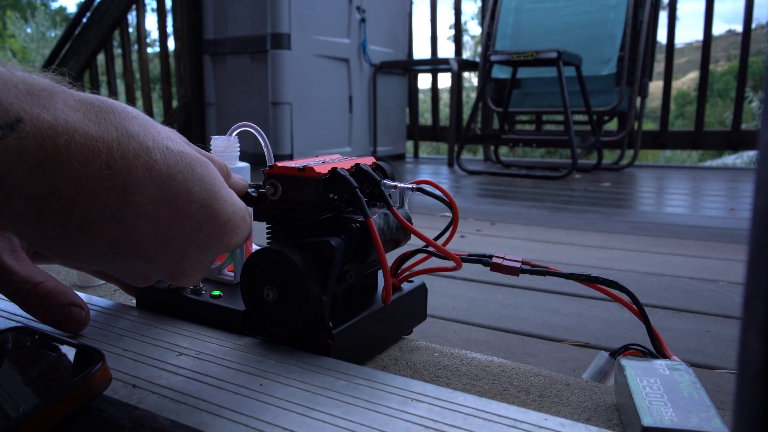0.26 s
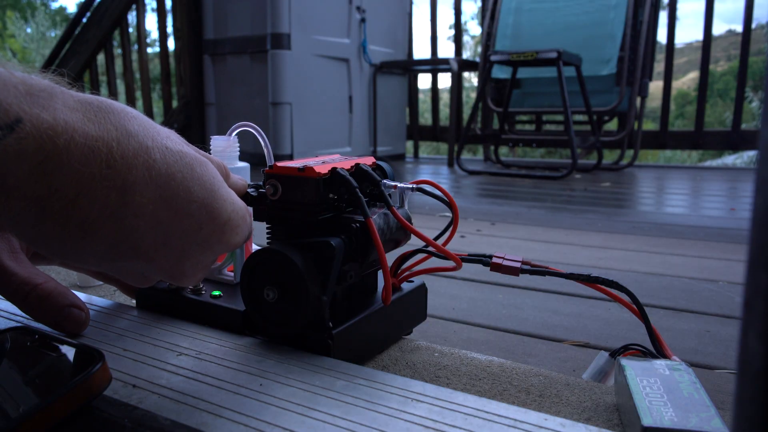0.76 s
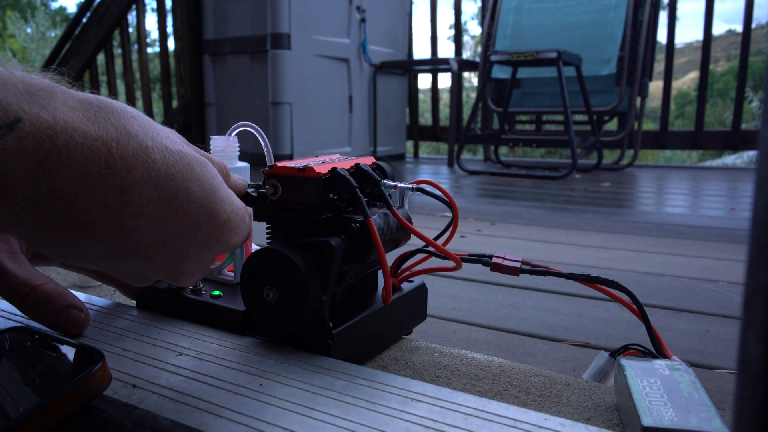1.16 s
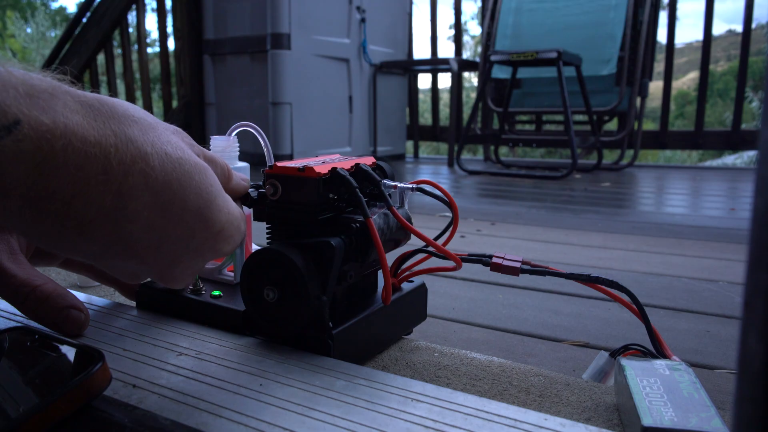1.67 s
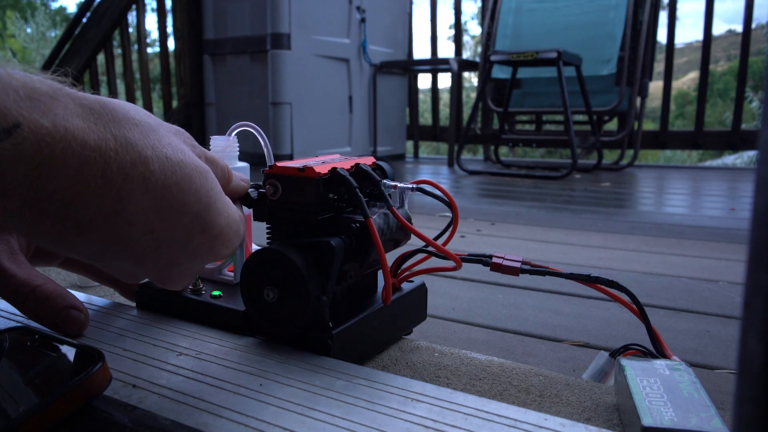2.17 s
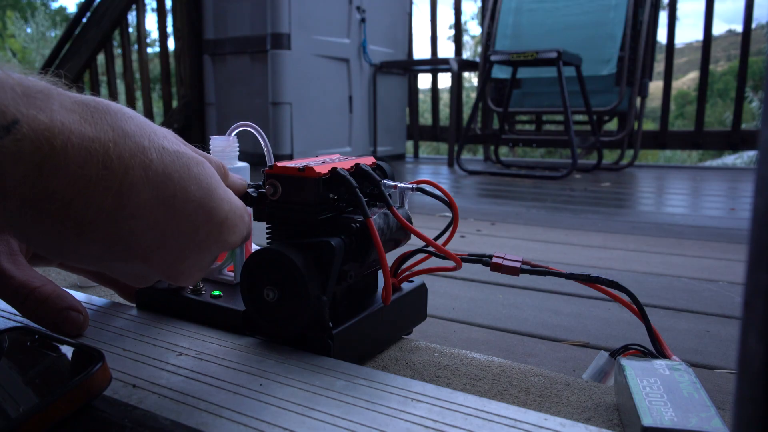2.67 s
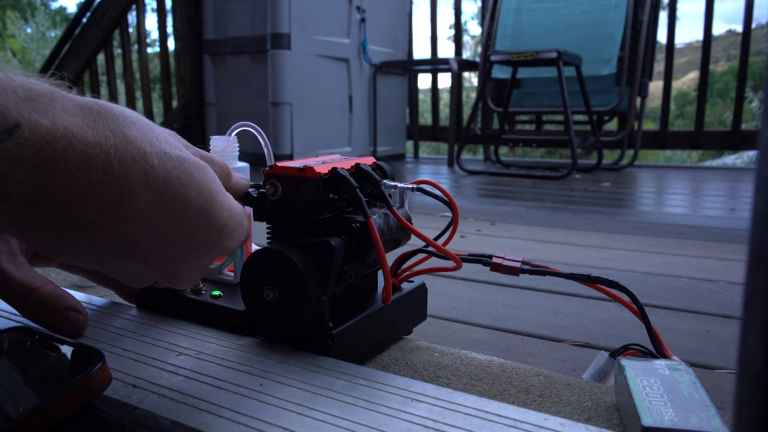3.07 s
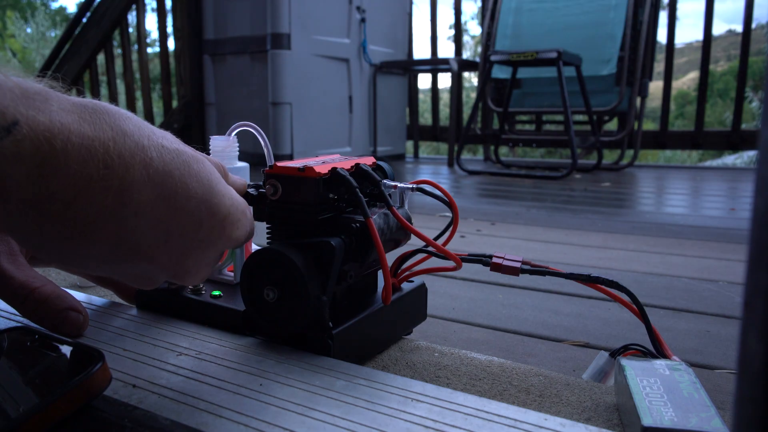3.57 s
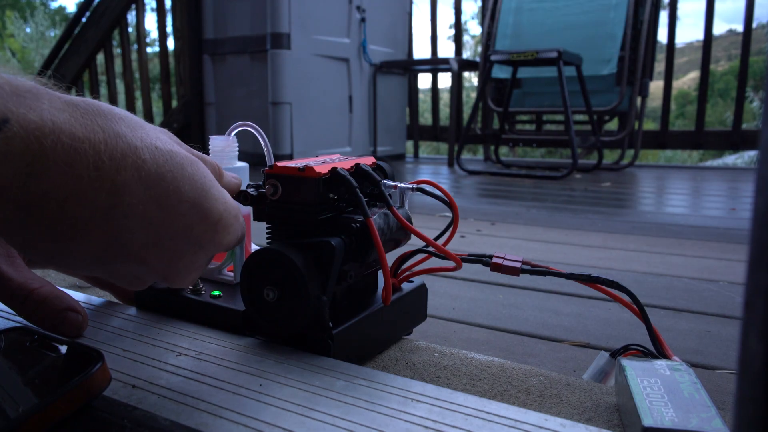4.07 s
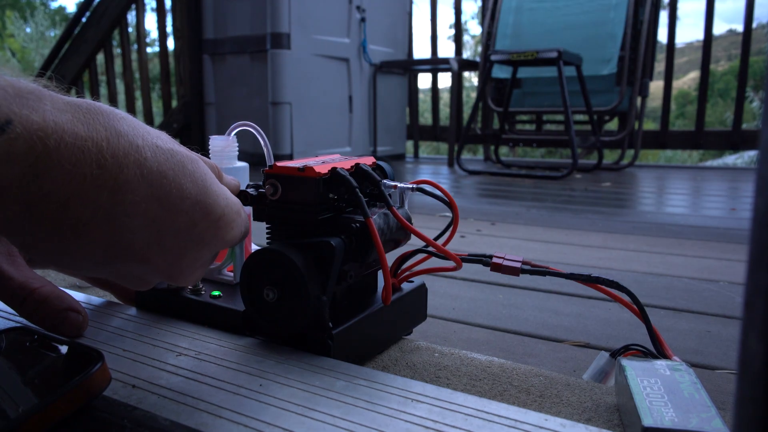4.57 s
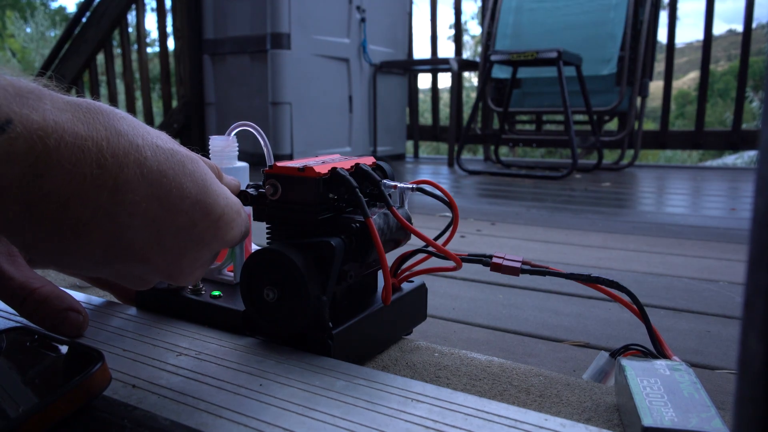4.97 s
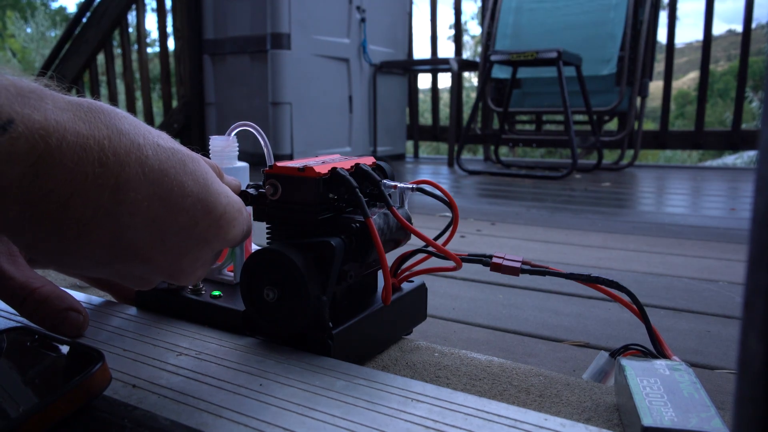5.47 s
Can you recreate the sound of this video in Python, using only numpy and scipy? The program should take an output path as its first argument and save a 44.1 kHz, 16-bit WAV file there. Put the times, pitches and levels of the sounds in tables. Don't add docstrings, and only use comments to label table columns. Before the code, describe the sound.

From the first instant an electric starter is already turning a tiny twin-cylinder engine, very close, on a wooden deck. The bed is a fast, even chug at roughly twenty-two cycles a second, two short air gulps per cycle, laced with valve clicks, metallic rattling, a high wavering gear whine that swells with each turn, and steady brush and fan hiss. A hard pop opens the sound; others follow at 0.1, a close pair at 0.4, another at 0.6, then scattered single pops to about 1.0. After a gap, several come between 1.4 and 1.7. From 1.9 to 2.6 there is only cranking, then pops near 2.7 and 3.0 with faint spits around them. A strong pair hits at 3.7, and from 3.9 pops crowd into an irregular, sputtering string, slightly weaker towards the end at 5.7. Each is a brief thump with a bright crack and short deck echo. It never runs steadily.

```python
import sys
import numpy as np
from scipy import signal
from scipy.fft import rfft, irfft, next_fast_len
from scipy.io import wavfile
from scipy.ndimage import uniform_filter1d

SR = 44100
rng = np.random.default_rng(int(sys.argv[2]) if len(sys.argv) > 2 else 0)


def nominal_scale(level):
    x = np.asarray(level, float) / 20
    return 10 ** x


def unload_wav(signal):
    wavfile.write(
        sys.argv[1],
        SR,
        np.round(np.clip(np.atleast_2d(signal).T, -1, 1) * 32767).astype(np.int16),
    )


N = 252163


def evened(x):
    return x / np.sqrt(np.mean(x ** 2) + 1e-20)


def read(points, hz):
    f, value = np.transpose(points)
    return np.interp(np.log(hz + 1), np.log(f + 1), value)


def add(mix, start_s, sound):
    part = mix[..., round(start_s * SR):][..., :sound.shape[-1]]
    part += sound[..., :part.shape[-1]]


def resonate(x, hz, width_hz):
    b, a = signal.iirpeak(hz, hz / (1.09 * width_hz), SR)
    return signal.lfilter(b, a, signal.lfilter(b, a, x))


# time_s, turn_cycles
CRANK = [(-0.0064, -1), (0.2602, 5), (0.3926, 8), (0.8775, 19), (1.0547, 23), (1.2329, 27), (1.4542, 32),
         (1.6781, 37), (2.3472, 52), (2.7474, 61), (3.2821, 73), (4.0881, 91), (4.2667, 95), (4.6262, 103),
         (4.8496, 108), (5.7488, 128)]


def cycles():
    return np.interp(np.arange(N) / SR, *np.transpose(CRANK))


# frequency_hz, coherence_ratio
COHERENCE = [(60, 1.0), (300, 1.0), (600, .96), (1500, .75), (3100, .4), (6800, .2), (15000, .05)]
# frequency_hz, density_db (per Hz)
HISS = [(40, -14), (70, -13), (300, -11), (600, -12), (850, -4), (1100, -7), (1680, 2), (2150, -8),
        (3100, -2), (4100, -5), (6500, 0), (9000, -6), (13400, -4), (15500, -6)]


def hiss():
    frames, hz = N // 128 + 5, np.fft.rfftfreq(512, 1 / SR)
    a, b, c, d, patches = rng.standard_normal((frames, 257, 5)).T
    patches = uniform_filter1d(patches, size=10, axis=0)
    patches = evened(uniform_filter1d(patches, size=6, axis=1))
    same = np.clip(read(COHERENCE, hz), -1, 1)[:, None]
    left = a + 1j * b
    right = same * left + np.sqrt(1 - same ** 2) * (c + 1j * d)
    z = np.array([left, right]) * nominal_scale(read(HISS, hz)[:, None] + 1.6 * patches)
    noise = signal.istft(z, nperseg=512, noverlap=384)[1][:, :N]
    breath_db = 1.47 * np.cos(2 * np.pi * (cycles() - .02))
    return nominal_scale(-44 + breath_db) * evened(noise)


# frequency_hz, t60_s
DECK_DECAY = [(200, 0.22), (1000, 0.039), (4000, 0.035), (12000, 0.066)]
# delay_s, level_db
ECHOES = [(.0077, -17), (.0124, -19), (.0158, -20), (.0195, -24)]


def deck(x):
    size, scatter_db = SR // 4, -15
    taps = np.zeros((2, size))
    at = np.arange(60, size - 20, 20) + rng.integers(0, 20, (2, (size - 61) // 20))
    np.put_along_axis(taps, at, rng.choice([-1., 1.], at.shape), 1)
    hz, t, z = signal.stft(taps, SR, nperseg=128)
    same = np.clip(read(COHERENCE, hz), 0, 1)[:, None]
    z = np.array([z[0], same * z[0] + np.sqrt(1 - same ** 2) * z[1]])
    z = z * np.exp(-np.log(1000) * t / read(DECK_DECAY, hz)[:, None])
    tail = signal.istft(z, SR, nperseg=128)[1]
    tail = nominal_scale(scatter_db) * tail / np.linalg.norm(tail[0])
    for delay_s, level_db in ECHOES:
        add(tail, delay_s, nominal_scale(level_db) * np.hanning(9) / 4)
    return signal.fftconvolve(x, tail, axes=1)[:, :N]


GEAR_LOAD = [
    (.29, 0.13, 0.22),
    (.64, 0.1, -0.24),
    (.92, 0.13, -0.2),
]
# frequency_hz, width_hz, level_db
GEAR_CASE = [(3370, 290, -57.5), (3088, 160, -62)]


def gears():
    turn, teeth_per_cycle, mesh_db = cycles(), 157, -51.5
    load = np.zeros(N)
    for place, length, force in GEAR_LOAD:
        distance = (turn - place + .5) % 1 - .5
        load += force * np.exp(-(distance / length) ** 2)
    wander = uniform_filter1d(rng.standard_normal(N), size=4000)
    wander = evened(uniform_filter1d(wander, size=4000))
    mesh = nominal_scale(mesh_db) * evened(load * np.sin(2 * np.pi * teeth_per_cycle * turn + .8 * wander))
    case = np.zeros(N)
    for hz, width_hz, level_db in GEAR_CASE:
        case += nominal_scale(level_db) * evened(resonate(rng.standard_normal(N), hz, width_hz))
    return mesh + (0.99 + abs(load)) * case


# place_cycles, frequency_hz, width_hz, shake_cycles, level_db, spread_db
RATTLES = [(0.866, 1550, 260, 0.19, -58.5, -2), (0.0044, 1620, 360, 0.12, -57, 2),
           (0.716, 829, 120, 0.15, -60.5, .5), (.22, 2600, 700, .03, -62, 1.5),
           (.46, 2700, 900, .02, -64, 1.5), (.77, 3050, 600, .1, -62, 1.5),
           (0.98, 1900, 11000, 0.086, -55.5, -2), (0.24, 4700, 1700, 0.013, -63, -0.5),
           (.76, 5700, 13000, 0.038, -56.5, 3.5), (1, 12000, 5400, 0.019, -69.5, 0),
           (0.45, 7500, 3400, 0.028, -57, 3.5), (1, 13000, 8300, 0.047, -72, 11.5)]


def rattles():
    out, turn = np.zeros(N), cycles() + 2
    blows = rng.standard_normal((5, 140)).clip(-1.7, 2)
    for place, hz, width_hz, length, level_db, spread_db in RATTLES:
        lap = turn - place
        force = nominal_scale(min(spread_db, 3) * blows[round(4 * place)])[lap.astype(int)]
        age = (lap % 1) / length
        shake = force * age * np.exp(-2 * age) * rng.standard_normal(N)
        out += nominal_scale(level_db) * evened(resonate(shake, hz, width_hz))
    return out


# place_cycles, pitch_hz, ring_s, level_db, spread_db
KNOCKS = [(.762, 1708, 0.0015, -34.5, 1), (0.812, 1470, 0.0024, -46, 0), (0.019, 834, 0.0029, -45.5, 1.5),
          (.47, 1240, 0.00027, -42.5, -2)]


def knocks():
    out, t = np.zeros(N), np.arange(700) / SR
    time_s, turn = np.transpose(CRANK)
    for place, pitch_hz, ring_s, level_db, spread_db in KNOCKS:
        envelope = (t / ring_s * np.exp(1 - t / ring_s)) ** 1.28
        for k, (late, sharp, hard) in enumerate(rng.standard_normal((129, 3))):
            start_s = np.interp(k - 1 + place, turn, time_s, -1, N) + 0.00021 * late
            tone = np.sin(2 * np.pi * pitch_hz * (1 + 0.021 * sharp) * t) * envelope
            if start_s >= 0:
                add(out, start_s, nominal_scale(level_db + spread_db * hard) * tone)
    return out


def slug(length_s):
    u = np.arange(0, length_s, 1 / SR) / length_s
    swing = (np.sin(3 * np.pi * u ** 1.15) - .14) / 1.14
    return swing * np.sin(np.pi * u ** 1.8) ** .6


# place_cycles, length_s, level_db, direction_sign
GULPS = [
    (.952, .0037, -36.5, -1),
    (.21, .0037, -35.3, -1),
    (.035, .003, -47, 1),
    (.289, .003, -47, 1),
    (.47, .0015, -40, 1),
    (.85, .013, -60, -1),
    (.105, .013, -60, -1),
]


def gulps():
    out = np.zeros(N)
    time_s, turn = np.transpose(CRANK)
    fired = np.interp(np.transpose(FRONT_POPS + REAR_POPS)[0], time_s, turn)
    for place, length_s, level_db, direction in GULPS:
        for k, hard in enumerate(rng.standard_normal(129)):
            moment = k - 1 + place
            start_s = np.interp(moment, turn, time_s, -1, N)
            unburnt = abs(fired + .02 - moment).min() > .07
            if start_s >= 0 and unburnt:
                add(out, start_s, direction * nominal_scale(level_db + 0.64 * hard) * slug(length_s))
    return out


# start_s, thump_db, jet_db
FRONT_POPS = [(0.1244, -23.5, -30.5), (0.3904, -22.5, -27.5), (0.6107, -22.5, -25), (0.7437, -28, -30.5),
              (1.4972, -23, -27.5), (1.7213, -24, -26), (2.657, -22, -26), (2.9682, -23, -24.5),
              (3.7276, -26, -31), (3.8176, -23.5, -32), (3.9519, -24, -26.5), (4.0412, -29, -33),
              (4.131, -23.5, -25.5), (4.2197, -27, -28), (4.5342, -25, -29), (4.669, -25, -31),
              (4.7578, -46, -39), (4.9375, -26, -30), (5.2068, -25.5, -34), (5.3425, -26.5, -34.5),
              (5.6128, -30.5, -34.5), (5.703, -29, -37)]
# start_s, thump_db, jet_db
SPITS = [(1.8548, -46, -42), (2.79, -50, -56), (2.9238, -56, -35.5), (3.0135, -50, -45), (3.058, -43, -47),
         (3.1035, -44, -38)]
# start_s, thump_db, jet_db
REAR_POPS = [(0.004, -21, -24.5), (0.402, -20.5, -25), (0.6226, -20, -23), (0.8872, -21.5, -27.5),
             (0.9749, -26, -34.5), (1.375, -21, -24), (1.5528, -25.5, -33), (3.7395, -20.5, -21.5),
             (4.008, -30.5, -32.5), (4.0977, -22.5, -29), (4.2316, -21, -27.5), (4.3213, -26, -33),
             (4.3669, -26, -34), (4.4097, -30.5, -37), (4.4562, -25, -35.5), (4.5459, -24, -32.5),
             (4.6357, -26, -36), (4.7252, -29.5, -37), (4.7699, -23.5, -32), (4.8589, -24, -32),
             (4.9493, -23.5, -33), (5.039, -24, -32.5), (5.1288, -25, -33.5), (5.2187, -24, -31),
             (5.309, -32.5, -39), (5.3993, -24.5, -32.5), (5.5326, -31.5, -42), (5.5793, -26, -35.5)]
# jet_share_ratio (of the ring that follows the jet), ring_db, crack_db, sizzle_db
FRONT_PORT = (.8, -5.5, -1.5, 0.9)
REAR_PORT = (-0.46, -8.5, 2, 0)
# frequency_hz, width_hz, level_db
PORT_RING = [(712, 164, 9), (1784, 830, 5.5), (2220, 260, -3.5), (2470, 570, 4.5), (2730, 2350, -18)]
CRACK = [(5770, 1940, -7.5), (6430, 1030, -1.5), (8410, 1440, -3.5)]
SIZZLE = [(10840, 2900, 3.5), (11730, 3700, 3.5), (13320, 730, 7)]


def pops():
    out, t = np.zeros((2, N)), np.arange(1500) / SR
    jet = (t / 0.00055) ** 2 * np.exp(-t / 0.00026) + 0.03 * np.exp(-t / 0.003)
    charges = [(*row, FRONT_PORT) for row in FRONT_POPS + SPITS]
    charges += [(*row, REAR_PORT) for row in REAR_POPS]
    for start_s, thump_db, jet_db, (share, ring_db, crack_db, sizzle_db) in charges:
        ring_level_db = thump_db + share * (jet_db - thump_db) + ring_db
        levels_db = ring_level_db, jet_db + crack_db, jet_db + sizzle_db
        common, left, right = rng.standard_normal((3, len(t))) * jet
        drive = common + .6 * np.array([left, right])
        for level_db, modes in zip(levels_db, (PORT_RING, CRACK, SIZZLE)):
            band = sum(nominal_scale(gain_db) * resonate(drive, hz, width_hz) for hz, width_hz, gain_db in modes)
            band = band / np.sqrt(np.mean(band.mean(0)[:150] ** 2))
            add(out, start_s - .0003, nominal_scale(level_db - 2.5) * band)
        add(out, start_s - .0005, nominal_scale(thump_db) * slug(.0039))
        add(out, start_s - .003, nominal_scale(thump_db - 24) * slug(0.01286))
        boards = np.sin(2 * np.pi * 258 * t) + .45 * np.sin(2 * np.pi * rng.uniform(300, 345) * t)
        boom = boards * t / .009 * np.exp(-t / .009)
        add(out, start_s, nominal_scale(thump_db - 15) * boom)
        tones = np.sin(2 * np.pi * 1050 * t) + 0.48 * np.sin(2 * np.pi * 700 * t)
        after_ring = tones * t / 0.0012 * np.exp(-t / 0.0016)
        add(out, start_s + 0.0014, nominal_scale(thump_db - 8) * after_ring)
    return out


def scene():
    engine = pops() + gulps() + knocks() + rattles() + gears()
    return engine + deck(engine) + hiss()


def low_pass(x):
    return signal.sosfilt(signal.butter(12, 16990, fs=SR, output="sos"), x)


# frequency_hz, level_db
LEAN = [(60, 0), (300, 0), (640, .5), (1400, 3.2), (3000, .3), (5600, -2.5), (10000, -2), (15000, 1.5)]
# frequency_hz, phase_rad
LEAD = [(60, 0), (300, 0), (700, -.25), (1300, -.5), (1900, -.5), (3100, .5), (3500, -.8), (4200, .7),
        (6200, .1), (7200, 1.0), (16000, 1.2)]
# frequency_hz, level_db
MICROPHONE = [(25, -32), (45, -14), (65, -2), (140, 3), (230, 0), (15700, 0), (16100, -4), (16850, -8),
              (16950, -80)]


def record(dry):
    size = next_fast_len(N)
    hz = np.fft.rfftfreq(size, 1 / SR)
    port = nominal_scale(read(LEAN, hz) / 2) * np.exp(.5j * read(LEAD, hz))
    z = rfft(dry, size) * np.array([port, 1 / port]) * nominal_scale(read(MICROPHONE, hz))
    x = irfft(z, size)[:, :N]
    top_hz, opens_db = 15900, -33
    top = irfft(z * (hz > top_hz), size)[:, :N]
    loud = uniform_filter1d((x ** 2).mean(0), size=200) > nominal_scale(2 * opens_db)
    near_loud = uniform_filter1d(1. * loud, size=300) > 1e-6
    gate = uniform_filter1d(1. * near_loud, size=200)
    return low_pass(x - (1 - gate) * top)


dry = scene()
out = record(dry)
unload_wav(out)
```